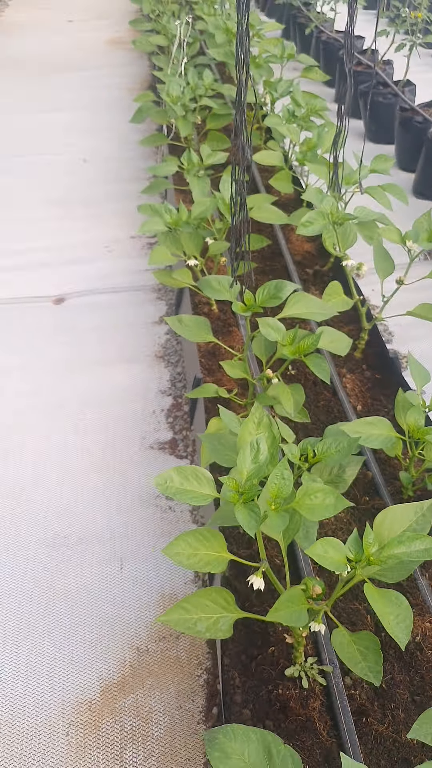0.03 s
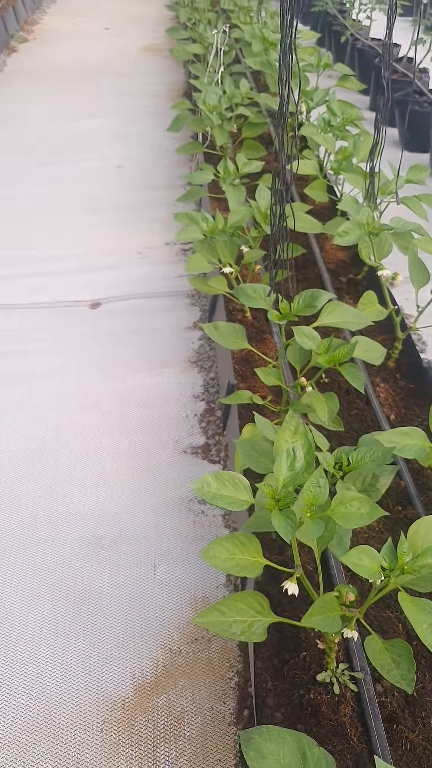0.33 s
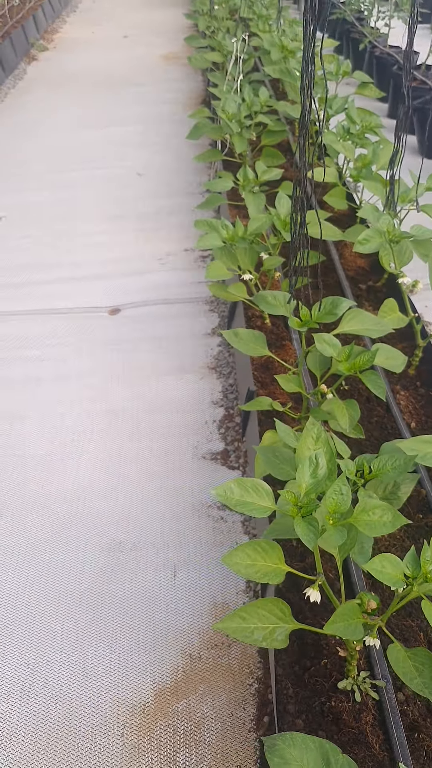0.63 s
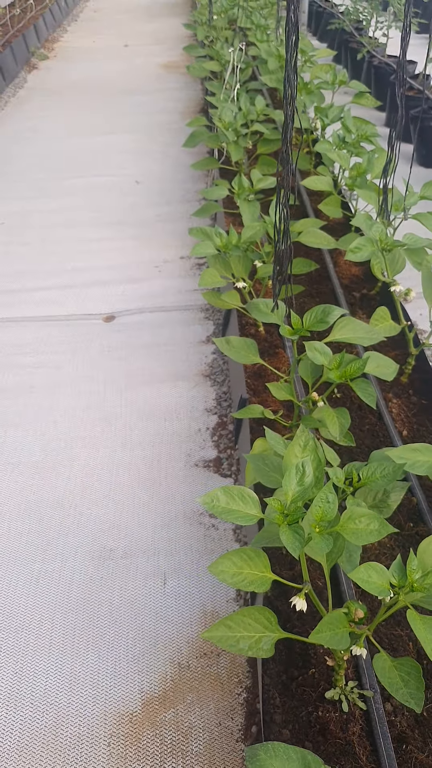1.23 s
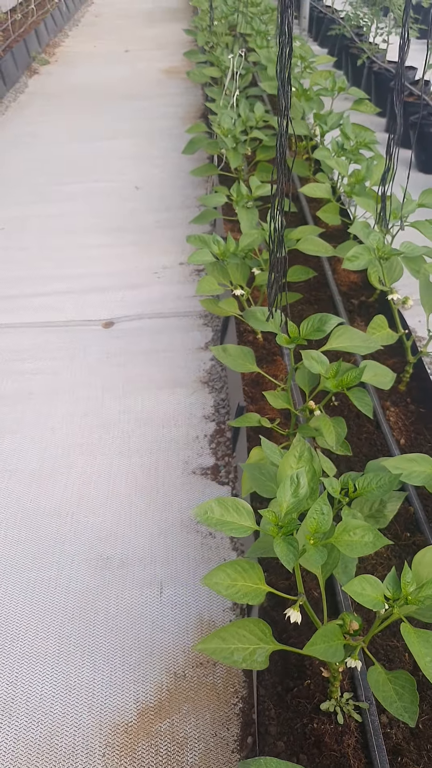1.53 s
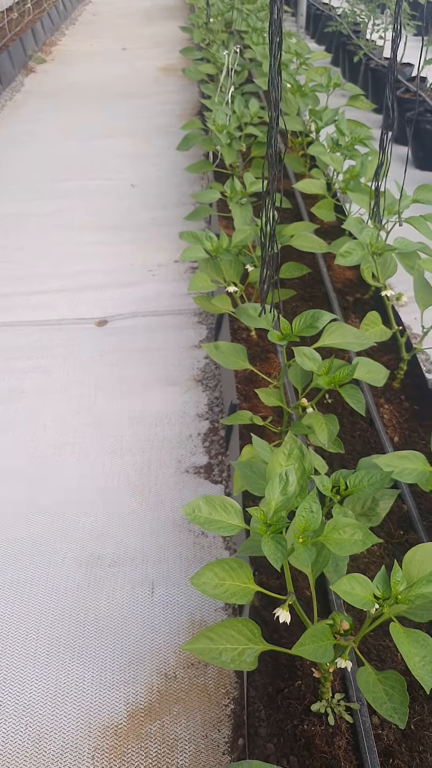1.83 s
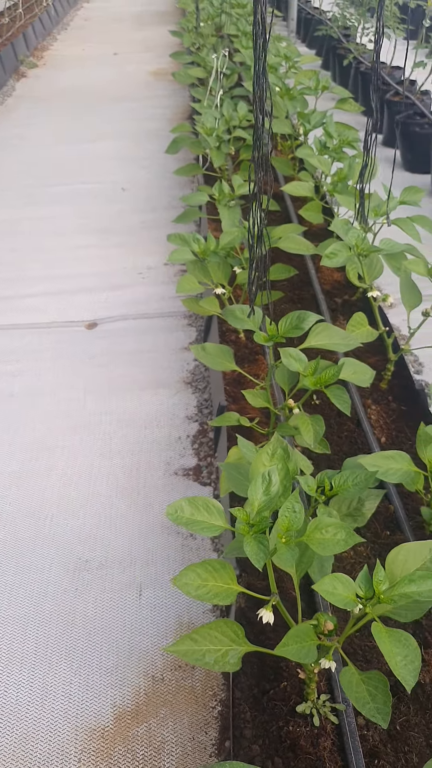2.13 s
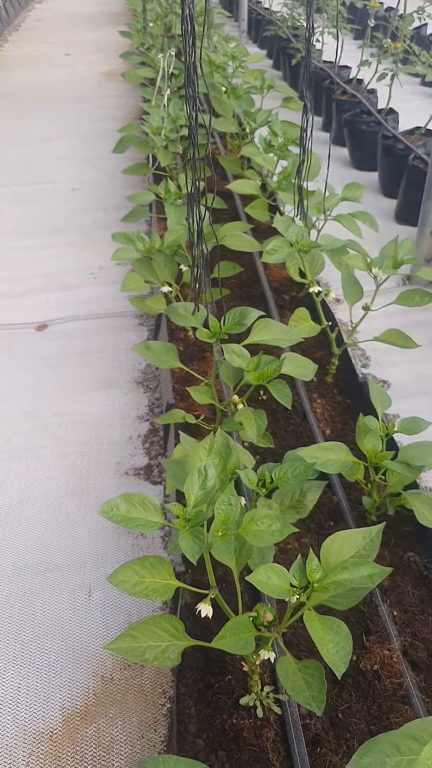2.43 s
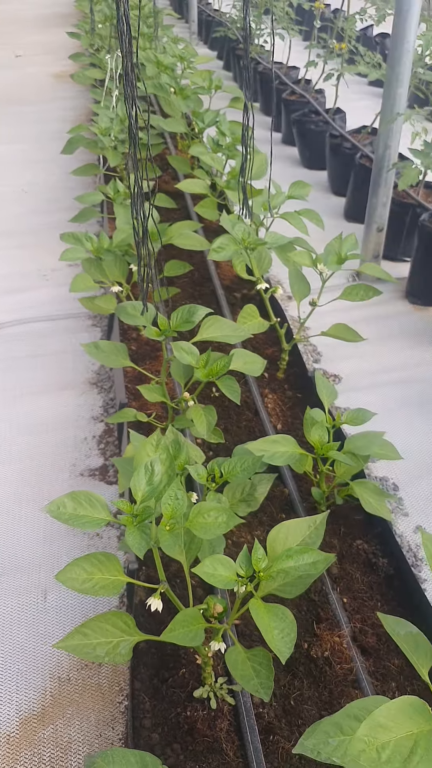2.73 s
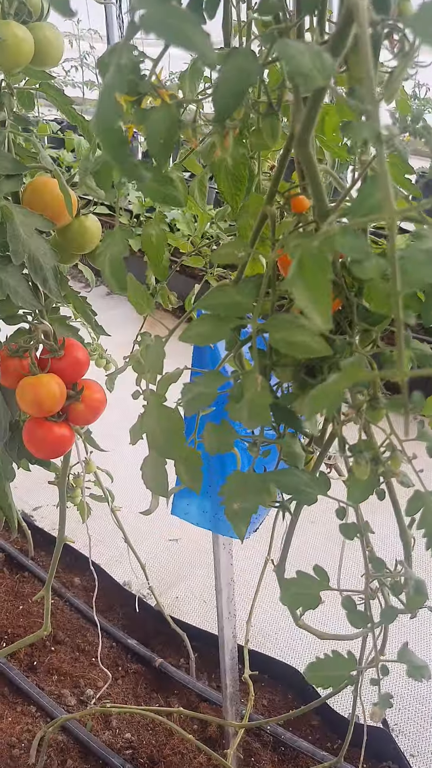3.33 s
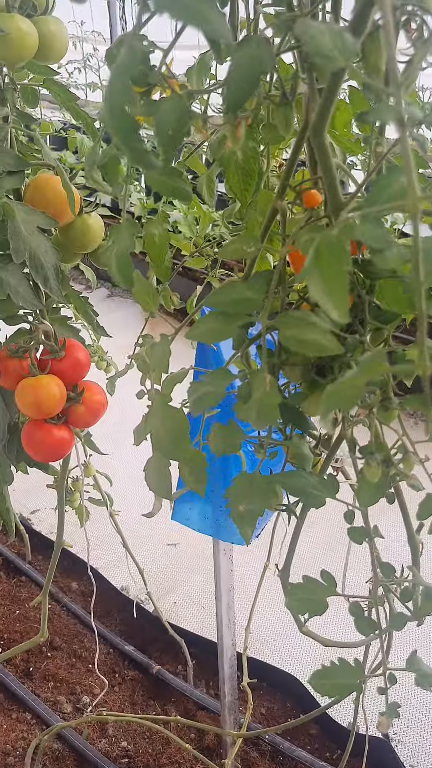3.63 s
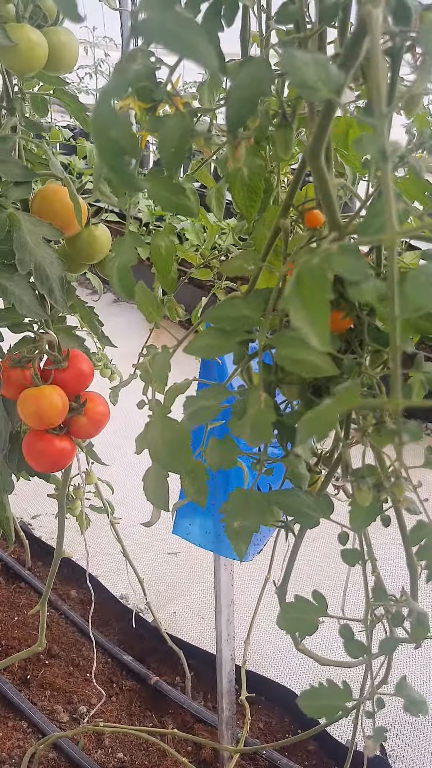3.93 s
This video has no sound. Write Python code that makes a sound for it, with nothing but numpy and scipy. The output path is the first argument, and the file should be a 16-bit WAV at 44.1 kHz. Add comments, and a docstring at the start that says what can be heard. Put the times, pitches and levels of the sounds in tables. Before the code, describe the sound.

Greenhouse fans drone steadily, mixing a deep hum, a motor whine and airy, flickering hiss. The microphone turns in the aisle, then the sound cuts with a faint tick to a slightly brighter spot among vines.

```python
"""In a greenhouse, ventilation fans run. Their rotation gives a low hum on harmonics of one shaft rate,
a motor whines with a swaying pitch among weaker tones, and turbulence gives a rush of air with a
flickering hiss. A two-port microphone drifts along an aisle and turns; then the sound cuts, with a
small tick, to a brighter spot among tall vines."""
import sys
import numpy as np
from scipy import signal
from scipy.fft import rfft, irfft
from scipy.io import wavfile
from scipy.ndimage import uniform_filter1d

SR = 44100
rng = np.random.default_rng(int(sys.argv[2]) if len(sys.argv) > 2 else 0)


def dump_mix(stems):
    """Bounce the given channels to the path in sys.argv[1] as a 16-bit WAV at rate SR."""
    frames = np.atleast_2d(stems).T  # one column per channel
    limited = np.clip(frames, -1, 1)  # hard clip at full scale
    pcm = np.round(limited * 32767).astype(np.int16)
    wavfile.write(sys.argv[1], SR, pcm)


N = 176400

TURN_FROM_S, TURN_TO_S, CUT_S = 1.5, 2.7, 3.385
AISLE_LAG_S, VINES_LAG_S = .00047, -.00029  # delay of direct sound at the left port behind the right
SHAFT_HZ, BLADES, MAINS_BUZZ_HZ = 43.08, 2, 100
WHINE_HZ, WHINE_JITTER_HZ = 785.85, .55
SWAY_PER_S, SWAY_PEAK_S, SWAY_DEPTH_HZ = 3.24, .102, 1.63

# Spectrum of the rushing air at each place: (frequency [Hz], relative spectral density [dB])
AISLE_AIR = [(25, -76), (45, -61.5), (70, -52), (130, -56), (185, -60.5), (260, -54), (340, -52.5),
             (470, -55.5), (580, -56), (690, -63.5), (815, -53), (950, -66.5), (1250, -67.5), (1620, -68),
             (1950, -73.5), (2200, -72), (2600, -76.5), (3300, -82), (5500, -87.5), (8500, -98),
             (13000, -97.5), (15500, -97.5)]
VINES_AIR = [(25, -82), (45, -53.0), (70, -52), (130, -50), (260, -47.0), (470, -51), (580, -51.5),
             (690, -57.5), (815, -50), (950, -62), (1600, -64.5), (2300, -71), (3000, -73.0), (5500, -81.5),
             (8500, -90.0), (13000, -91.0), (15500, -92)]
# Share of the air's power common to both ports: (frequency [Hz], coherence [0-1])
AIR_COHERENCE = [(60, .99), (130, .97), (300, .9), (640, .55), (1400, .35), (3000, .3), (8000, .1)]
# Level of the air, left minus right: (frequency [Hz], aisle [dB], vines [dB])
AIR_BALANCE = [(70, 5.5, 3.5), (300, 2, 1.5), (815, 3, 3.6), (1600, -4.5, 2.3), (2280, -4.5, 3),
               (3000, 6, 4), (5500, -4.5, 1.5), (9000, 1, 4)]
# Brief swells of the hiss: (time [s], level [dB])
HISS_SWELLS = [(.28, -55), (.545, -56), (.598, -54), (.73, -52), (1.27, -57), (1.60, -54), (1.70, -56),
               (1.82, -52), (1.848, -53), (2.122, -51), (2.45, -56), (2.64, -56), (2.815, -56),
               (3.005, -56), (3.05, -54), (3.365, -55)]
# Weaker wavering tones, most clustered around the whine, plus two low hums and one high tone:
# (frequency [Hz], then before the turn, after it and among the vines: left [dB], right [dB])
WEAK_TONES = [(58.6, -40, -43, -52, -58, -46, -51), (117.2, -41, -43, -48, -52, -56, -58),
              (571, -44, -45, -45, -45, -43, -52), (743, -50, -41, -48, -42, -54, -49),
              (763, -47, -57, -54, -60, -50, -58), (809, -43, -46, -50, -56, -46, -56),
              (830.5, -37, -37, -34, -39, -42, -42), (1709, -66, -51, -60, -56, -61, -58)]
# Relative levels of the hum:
# (shaft harmonic [number], aisle left [dB], aisle right [dB], vines left [dB], vines right [dB])
HUM_HARMONICS = [(1, -50, -53, -40, -44), (2, -22.3, -22.3, -32, -30.5), (3, -33, -34, -28, -31),
                 (5, -47, -51, -41, -44), (6, -42, -46, -34, -35), (7, -39, -42, -40, -44),
                 (8, -42, -43, -46, -50)]
# Dips of the blade-pass tone: (time [s], level [dB])
HUM_DIPS = [(1.09, -6), (3.0, -3.5)]
# Main whine, one row each before the turn, after it and among the vines: (left [dB], right [dB])
WHINE_LEVELS = [(-21.5, -29.5), (-19, -44), (-25.5, -20.5)]
# Side tones of the whine:
# (harmonic [number], offset [mains buzz steps], then for the same positions: left [dB], right [dB])
WHINE_SIDE_TONES = [(1, -2, -43, -51, -45, -49, -40, -43), (1, 1, -58, -40, -42, -40, -39, -40),
                    (2, -2, -52, -52, -48, -47, -43, -43), (2, 0, -63, -66, -53, -52, -54, -64),
                    (2, 1, -59, -47, -60, -57, -64, -52), (3, -2, -47, -45, -56, -54, -48, -51),
                    (3, -1, -61, -49, -60, -58, -54, -55), (4, -4, -65, -68, -65, -66, -57, -62),
                    (4, -1, -70, -65, -59, -70, -58, -59)]


def undb(db):
    """Amplitude ratio of a level in decibels."""
    return 10 ** (np.asarray(db) / 20)


def walk(rate):
    """Slow fluctuation of unit spread: random values held for 1 / rate seconds and smoothed twice."""
    hold = max(int(SR / rate), 1)
    steps = np.repeat(rng.standard_normal(N // hold + 2), hold)
    smooth = uniform_filter1d(uniform_filter1d(steps, hold), hold)
    smooth = smooth[rng.integers(hold):][:N]
    return (smooth - smooth.mean()) / smooth.std()


def on_log(f, table, column=1):
    """Interpolation of one table column over logarithmic frequency."""
    table = np.array(table, float)
    return np.interp(np.log(f + 1), np.log(table[:, 0]), table[:, column])


def port_lag(hz, lag, direct_from_hz=1380):
    """Arrival-time difference: diffuse bass comes from all round, so it lags less than direct sound."""
    return lag * np.sqrt(np.minimum(hz / direct_from_hz, 1))


def tone(t, hz, levels_db):
    """A sinusoid at two ports: its levels and phase difference depend on the microphone's position."""
    before, after, vines = np.reshape(levels_db, (-1, 2, 1))
    turn = np.clip((t - TURN_FROM_S) / (TURN_TO_S - TURN_FROM_S), 0, 1)
    db = np.where(t < CUT_S, before + (after - before) * turn, vines)
    lag = port_lag(hz, np.where(t < CUT_S, AISLE_LAG_S, VINES_LAG_S))
    cycles = np.cumsum(hz) / SR + rng.random() + np.array([[-.5], [.5]]) * lag * hz
    return np.sqrt(2) * undb(db) * np.sin(2 * np.pi * cycles)


def rushing_air(t, spectrum, lag, balance_column):
    """Turbulence radiates broadband, partly coherent noise; the blades amplitude-modulate its lows."""
    f = np.arange(N // 2 + 1) * SR / N
    sides = np.array([[.5], [-.5]])
    coherence = on_log(f, AIR_COHERENCE)
    shared = rfft(rng.standard_normal(N)) * np.exp(-2j * np.pi * f * port_lag(f, lag) * sides)
    separate = rfft(rng.standard_normal((2, N)))
    ports = np.sqrt(coherence) * shared + np.sqrt(1 - coherence) * separate
    density_db = on_log(f, spectrum) + sides * on_log(f, AIR_BALANCE, balance_column)
    ports = ports * undb(density_db) * np.sqrt(SR / 2)
    octave = np.clip(np.log2((f + 1) / SHAFT_HZ), 0, 8)
    blade_chop = 1 + .33 * np.cos(2 * np.pi * BLADES * SHAFT_HZ * t)
    common_flicker = 1.3 * (walk(24) + walk(70)) / np.sqrt(2)
    out = 0
    for k in range(9):
        hz = SHAFT_HZ * 2 ** k
        band = irfft(ports * np.maximum(1 - abs(octave - k), 0), N)
        treble = min(hz / 6200, 1)  # high octaves flicker mostly together, low ones each alone
        band = band * undb(treble * common_flicker + (.5 - treble) * 1.6 * walk(34.97))
        out = out + band * (blade_chop if 150 < hz < 500 else 1)
    return out


def hiss_swells(t, width_s=.017):
    """Amplitude modulation: high-passed noise swells briefly under Gaussian envelopes."""
    highpass = signal.butter(1, 3000, "high", fs=SR, output="sos")
    hiss = signal.sosfilt(highpass, rng.standard_normal((2, N)))
    return hiss * sum(undb(db) * np.exp(-.5 * ((t - s) / width_s) ** 2) for s, db in HISS_SWELLS)


def tick(t, decay_s=.0004):
    """A short transient has a broad spectrum; low-passed, it gives a dull tick at the change of place."""
    burst = (t >= CUT_S) * np.exp(-abs(t - CUT_S) / decay_s) * rng.standard_normal(N)
    return undb(-14) * signal.sosfilt(signal.butter(1, 2500, fs=SR, output="sos"), burst)


def weak_tones(t, drift=.0011, flutter_db=2):
    """Superposition of weak wavering tones: most around the whine, plus two low hums and one high tone."""
    return sum(tone(t, hz * (1 + drift * walk(10)), levels_db) * undb(flutter_db * walk(14))
               for hz, *levels_db in WEAK_TONES)


def fan_hum(t, drift=.0029, dip_width_s=.03):
    """Periodic rotation radiates harmonics of the shaft rate; the blade-pass tone leads in the aisle."""
    shaft_hz = SHAFT_HZ * (1 + drift * walk(7))
    dips_db = sum(db * np.exp(-.5 * ((t - s) / dip_width_s) ** 2) for s, db in HUM_DIPS)
    out = 0
    for harmonic, *levels_db in HUM_HARMONICS:
        aisle_db, vines_db = levels_db[:2], levels_db[2:]
        waver_db = 1.2 * walk(7) + dips_db if harmonic == BLADES else 1.5 * walk(13)
        out = out + tone(t, harmonic * shaft_hz, [aisle_db, aisle_db, vines_db]) * undb(.13 + waver_db)
    return out


def motor_whine(t, flutter_db=.78, side_flutter_db=1.5):
    """Frequency modulation sways the whine; side tones, offset by steps of the mains buzz, follow it."""
    sway_hz = SWAY_DEPTH_HZ * np.cos(2 * np.pi * SWAY_PER_S * (t - SWAY_PEAK_S))
    whine_hz = WHINE_HZ + sway_hz + WHINE_JITTER_HZ * walk(25.07)
    out = tone(t, whine_hz, WHINE_LEVELS) * undb(flutter_db * walk(30.2))
    for harmonic, steps, *levels_db in WHINE_SIDE_TONES:
        side_hz = harmonic * whine_hz + steps * MAINS_BUZZ_HZ
        out = out + tone(t, side_hz, levels_db) * undb(side_flutter_db * walk(30.03))
    return out


def scene():
    """Sound pressures add: air, hum and whine are heard first in the aisle, then among the vines."""
    t = np.arange(N) / SR
    aisle_air = undb(.56) * rushing_air(t, AISLE_AIR, AISLE_LAG_S, balance_column=1)
    vines_air = undb(-.5) * rushing_air(t, VINES_AIR, VINES_LAG_S, balance_column=2)
    air = np.where(t < CUT_S, aisle_air, vines_air)
    return air + fan_hum(t) + motor_whine(t) + weak_tones(t) + hiss_swells(t) + tick(t)


def record(dry):
    """Band limiting: a steep elliptic low-pass removes the treble above 15.6 kHz."""
    return signal.sosfilt(signal.ellip(10, .1, 80, 15600, fs=SR, output="sos"), dry)


dry = scene()
out = record(dry)
dump_mix(out)
```